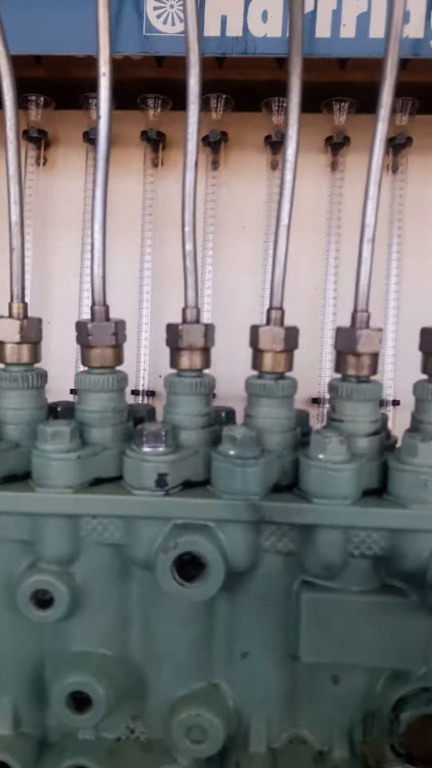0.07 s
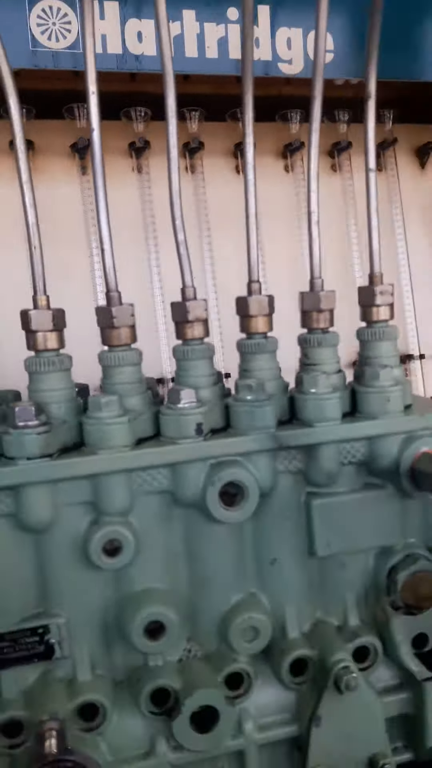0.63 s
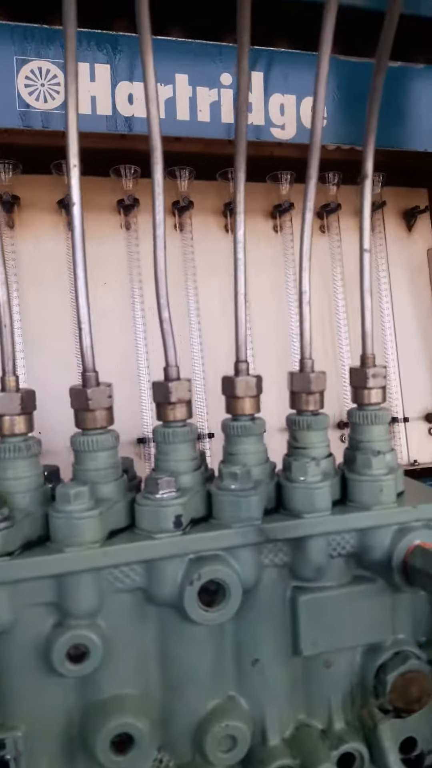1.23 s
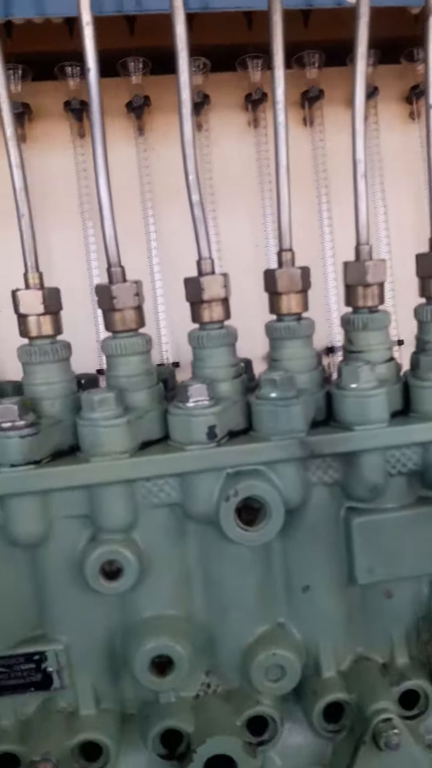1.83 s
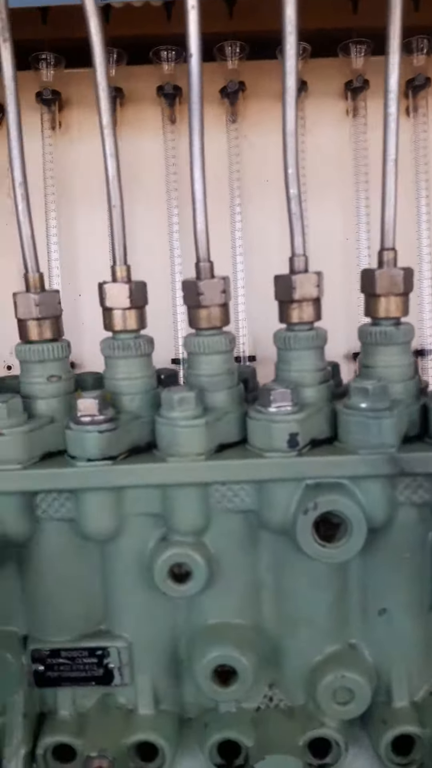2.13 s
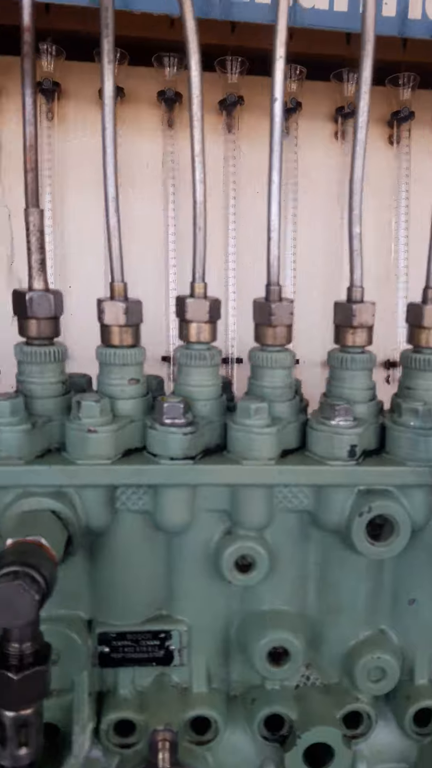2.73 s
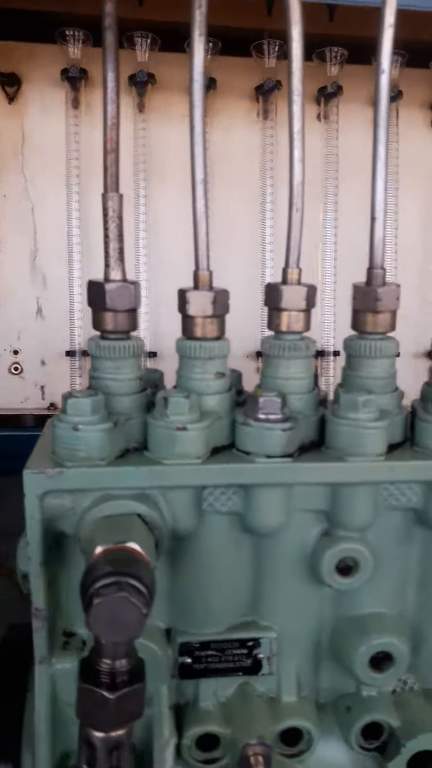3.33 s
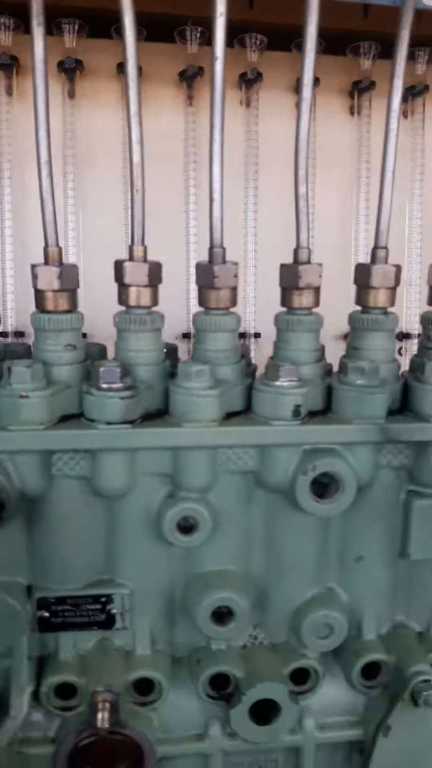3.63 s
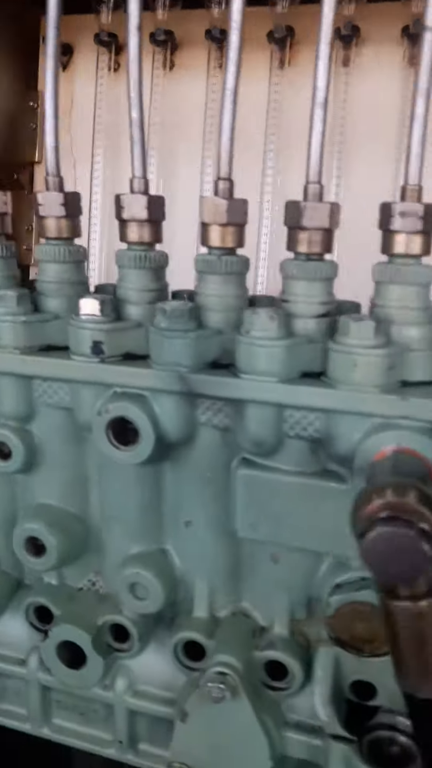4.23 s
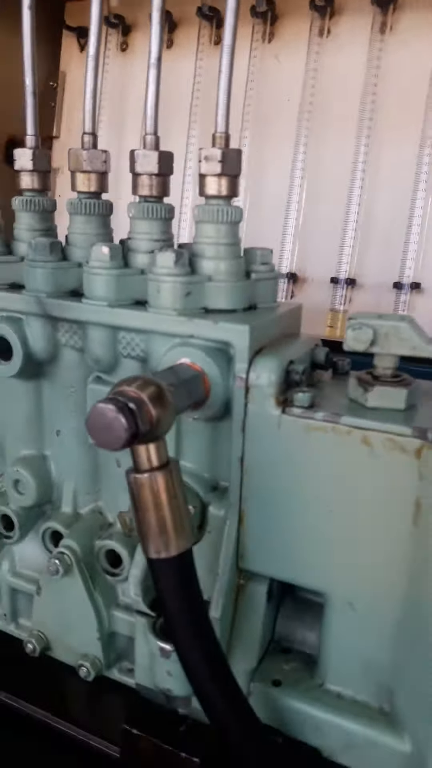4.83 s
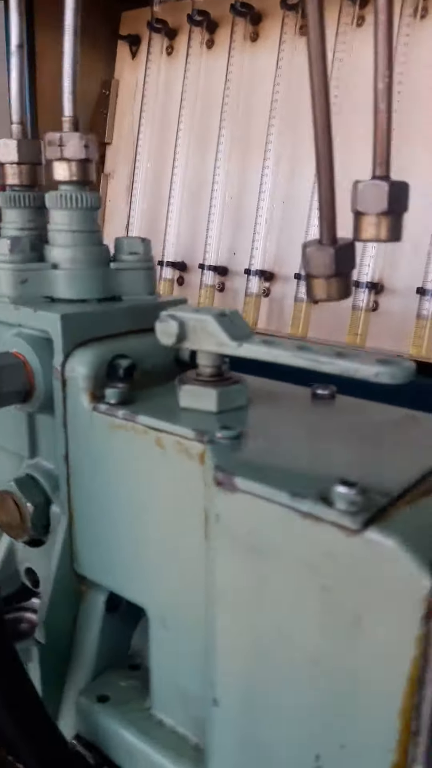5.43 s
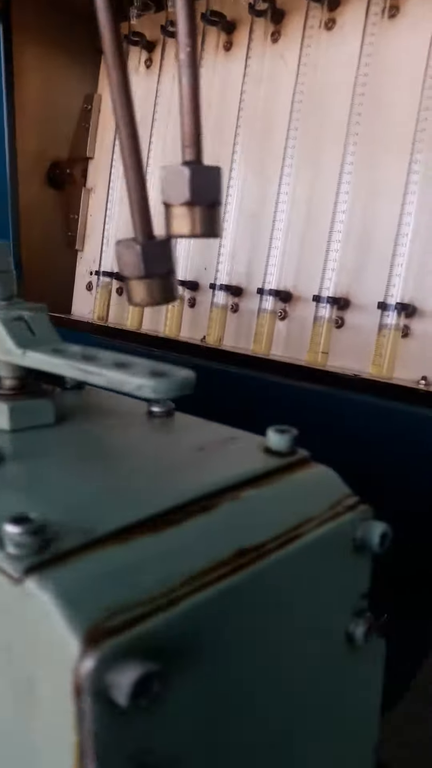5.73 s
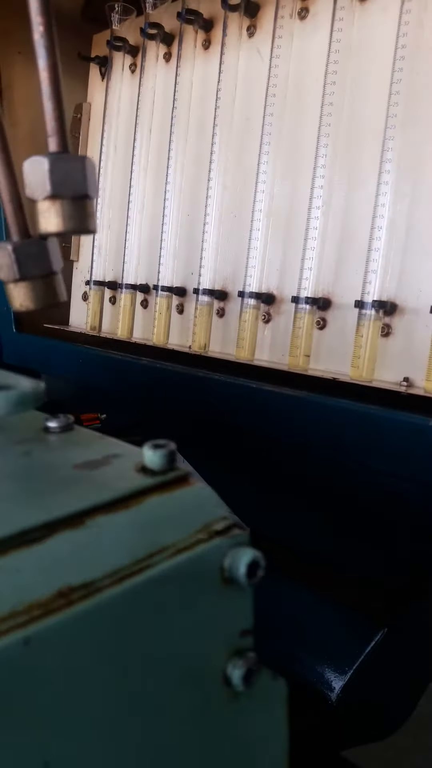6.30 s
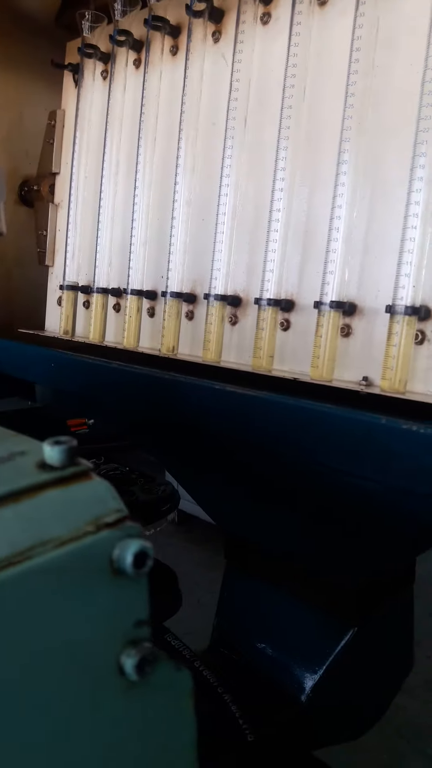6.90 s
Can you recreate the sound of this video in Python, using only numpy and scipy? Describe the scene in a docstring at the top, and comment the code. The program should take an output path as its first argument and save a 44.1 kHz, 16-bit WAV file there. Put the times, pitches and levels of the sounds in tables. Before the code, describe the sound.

Steady mechanical humming and fast, slightly limping clatter from a fuel pump, with ringing steel pipes and bright ticking.

```python
"""A diesel injection pump drones and clatters on a workshop test bench, turning about 590 times a minute.
Eight plungers (small pistons) each push once a turn and make the housing hum. Each stroke knocks, its
valve shuts with a clack, an injector needle ticks and sprays, and spilling fuel hisses. The strokes are
unequal, so the clatter limps once a turn. Steel pipes and the cover of the governor (the speed control)
ring along. We listen through a phone carried from the pump's face, round a corner, to the governor end."""
import sys
import numpy as np
from scipy import signal
from scipy.fft import rfft, irfft
from scipy.io import wavfile
from scipy.ndimage import uniform_filter1d

SR = 44100
rng = np.random.default_rng(int(sys.argv[2]) if len(sys.argv) > 2 else 0)


def unload_audio(sound):
    """Save the sound as a 16-bit wav file, at the path given as the first command line argument."""
    columns = np.transpose(np.atleast_2d(sound))
    # keep every value between -1 and 1, then stretch to whole-number steps
    steps = np.round(np.clip(columns, -1, 1) * 32767)
    wavfile.write(sys.argv[1], SR, steps.astype(np.int16))


N = 311346
T = np.arange(N) / SR
SHAFT_HZ = 9.8627  # turns a second


# The tones in the hum: (multiple of the shaft speed, level at face [dB], level at governor end [dB])
HUM_TONES = [(8, -25, -25), (13, -23, -22), (16, -6, -9), (17, -17, -20), (20, -15, -17), (22, -16, -16),
             (24, -2, -1), (25, -15, -26), (26, -22, -15), (27, -15, -26), (28, -15, -22), (30, -14, -16),
             (31, -25, -20), (32, -19, -23), (33, -17, -11), (34, -10, -9), (35, -14, -16), (36, -19, -13),
             (40, -10, -9), (48, -14, -27), (56, -19, -20), (64, -22, -15), (72, -22, -18), (80, -17, -26),
             (96, -11, -26), (101, -13, -17), (104, -13, -26), (112, -11, -27), (117, -21, -16),
             (119, -16, -23)]
# Overall level of the deep tones: (face [dB], corner [dB], governor end [dB])
DEEP_HUM_DB = (-18.2, -16.5, -16)
# Quiet and loud spots of a standing wave in the room: (place [0-1], half-width [0-1], level [dB])
ROOM_SPOTS = [(.13, .06, -2.5), (.6, 0.22, 2.8)]

def housing_hum(clock, place, near_db):
    """The strokes shake the housing at multiples of the shaft speed, which add up to a drone."""
    # Deep tones fill the room, so distance matters little; the higher ones carry like the knock.
    deep_db = level_at(place, DEEP_HUM_DB) + .35 * near_db
    corner_dip_db = 2.9 * np.sin(np.pi * place)  # sound from two walls partly cancels here
    high_db = level_at(place, KNOCK_LEVEL_DB) + near_db + 1.73 - corner_dip_db
    spots_db = sum(db * np.exp(-((place - centre) / width) ** 2) for centre, width, db in ROOM_SPOTS)
    hum = 0
    for multiple, face_db, end_db in HUM_TONES:
        db = face_db + (end_db - face_db) * place + (deep_db if multiple < 26 else high_db)
        if multiple == 24:  # the strongest tone forms the standing wave
            db = db + spots_db
        # Each tone crosses the bench with its own delay, spreading the hum over the whole turn.
        lag = .096 * multiple ** 2 + .012 * wander(3.97)
        tone = np.sin(2 * np.pi * (multiple * SHAFT_HZ * clock - lag))
        hum = hum + gain(db + .5 * wander(2.98)) * tone
    return np.sqrt(2) * hum


# The eight strokes of a turn: (start [s], knock [dB], reseat knock [dB], clack [dB], tick [dB], spill [dB])
PLUNGER_STROKES = [(.0095, -1, -7, -2, -3, -4), (.0215, 0, -1, -4, -7, -4), (.0348, 1, -4, -4, -3, -2),
                   (.0475, 0, -5, -3, -6, -4), (.0602, -2, -4, 0, 1.4, 0), (.0725, -5, -6, -3, -6, -4),
                   (.0850, -1, -7, -2, -4, -3), (.0972, -2, -4, -4, -7, -4)]
STARTS_S, KNOCKS_DB, RESEATS_DB, CLACKS_DB, TICKS_DB, SPILLS_DB = np.transpose(PLUNGER_STROKES)
# Tone colour of the cast metal body: (frequency [Hz], face [dB], corner [dB], governor end [dB])
BODY_COLOUR = [(49.4, -60, -74, -50), (101, -24.5, -28, -24.5), (209, -17, -20, -24.5),
               (352, -17, -20, -10), (432, -20.5, -28, -22.5), (520, -19.5, -23.5, -27.5),
               (646, -23.5, -26.5, -17.5), (793, -15.5, -17, -21), (885, -19, -24.5, -24.5),
               (982, -12, -28, -12.5), (1036, -16, -21.5, -24), (1140, -18.5, -24.5, -23.5),
               (1646, -22, -25.5, -25), (2610, -48.5, -53, -52)]
# Level of the knock: (face [dB], corner [dB], governor end [dB])
KNOCK_LEVEL_DB = (-20.5, -19, -18.5)

def plunger_knock(clock, place):
    """Each plunger knocks on the pump's body, and its valve reseats with a second knock half a stroke later,
    almost alike on every turn."""
    hits = blows(clock, KNOCKS_DB, late_s=0, rise_s=.001, decay_s=.0035, scatter_db=.5)
    reseats = blows(clock, RESEATS_DB, late_s=.006, rise_s=.001, decay_s=.003, scatter_db=.5)
    force = pulsed(rattle(clock, alike=.95, renew_s=1.7), hits + reseats, echo_db=-4 + 9 * place)
    body = np.array(BODY_COLOUR)
    knock = 0
    for side in range(3):  # face, corner, governor end: the nearest is heard most
        share = np.maximum(1 - np.abs(2 * place - side), 0)
        knock = knock + share * colour(force, body[:, [0, side + 1]])
    return gain(level_at(place, KNOCK_LEVEL_DB)) * knock


# Tone colour of a closing valve: (frequency [Hz], level [dB])
CLACK_COLOUR = [(300, -19.5), (1000, -9), (1600, -6), (2000, -2.5), (2350, -1.5), (2750, 3), (3150, -3),
                (3450, -6.5), (4200, -7), (5000, -14.5), (8000, -48.5)]
# Level of the clack: (face [dB], corner [dB], governor end [dB])
CLACK_LEVEL_DB = (-19.5, -19.5, -19)

def valve_clack(clock, place):
    """The valves that let the fuel out clack shut, one for each stroke."""
    power = blows(clock, CLACKS_DB, late_s=.0004, rise_s=.0018, decay_s=.006, scatter_db=.5)
    clack = pulsed(rattle(clock, alike=.6, renew_s=.903), power, echo_db=.5 + 1.7 * place)
    return gain(level_at(place, CLACK_LEVEL_DB)) * colour(clack, CLACK_COLOUR)


# Ringing notes of the steel pipes: (frequency [Hz], width [Hz], level [dB])
PIPE_NOTES = [(2770, 74, -10.5), (3053, 23, 8.5), (3124, 33, 0)]
# Level of the pipes: (face [dB], corner [dB], governor end [dB])
PIPE_LEVEL_DB = (-26.5, -26.5, -27.5)

def pipe_ping(clock, place):
    """Each shot of fuel jolts the steel pipes, which ping on after it."""
    power = blows(clock, TICKS_DB, late_s=0, rise_s=.001, decay_s=.003, scatter_db=.6)
    jolts = pulsed(rattle(clock, alike=.75, renew_s=.8), power, echo_db=-14)
    return gain(level_at(place, PIPE_LEVEL_DB)) * ring(jolts, PIPE_NOTES)


# Ringing notes of the governor cover: (frequency [Hz], width [Hz], level [dB])
COVER_NOTES = [(1975, 35, -5), (2030, 25, 0), (2100, 50, -7)]
# Level of the cover: (face [dB], corner [dB], governor end [dB])
COVER_LEVEL_DB = (-29.5, -23.9, -22.5)

def cover_ring(clock, place):
    """The cover is shaken hardest once a turn; its main note sings at 205 times the shaft speed."""
    hardest_s, swell_db = .021, 3
    swell = gain(swell_db * np.cos(2 * np.pi * SHAFT_HZ * (clock - hardest_s)))
    tone = normalise(gain(1.5 * wander(30)) * np.sin(2 * np.pi * 205 * SHAFT_HZ * clock))
    shake = ring(rattle(clock, alike=.8, renew_s=.8), COVER_NOTES)
    tone_share = .15 + .35 * place  # the note is clearer close to the cover
    cover = np.sqrt(1 - tone_share) * shake + np.sqrt(tone_share) * tone
    return gain(level_at(place, COVER_LEVEL_DB)) * normalise(swell * cover)


# Tone colours of the needle's tick and the fuel spray: (frequency [Hz], level [dB])
TICK_COLOUR = [(2000, -13), (3800, -8.5), (4400, -4.5), (5200, -3.5), (5900, 4), (6500, 2), (7100, -6.5),
               (7900, -26.5), (10000, -43)]
SPRAY_COLOUR = [(8000, -24), (10500, -7), (12000, -3), (13600, 5), (16000, -3)]
# Their levels: (face [dB], corner [dB], governor end [dB])
TICK_LEVEL_DB = (-25.3, -27, -29)
SPRAY_LEVEL_DB = (-40.4, -42, -46)

def injectors(clock, place):
    """Needles snap with a bright tick and a fine spray, both more blurred from the governor end."""
    power = blows(clock, TICKS_DB, late_s=.0003, rise_s=.0016, decay_s=.0042, scatter_db=.9)
    tick = pulsed(rattle(clock, alike=.31, renew_s=1.26), power, echo_db=-3.5 + 5.9 * place)
    spray = pulsed(rng.standard_normal(N), power, echo_db=-14 + 8 * place)
    return (gain(level_at(place, TICK_LEVEL_DB)) * colour(tick, TICK_COLOUR)
            + gain(level_at(place, SPRAY_LEVEL_DB)) * colour(spray, SPRAY_COLOUR))


# Tone colour of the spilling fuel: (frequency [Hz], level [dB])
SPILL_COLOUR = [(5000, -6), (7300, -2), (8000, -8), (8700, 1), (9250, 2), (9650, 0), (10100, 3),
                (11300, -5), (12500, -16), (16000, -30)]
# Level of its hiss: (face [dB], corner [dB], governor end [dB])
SPILL_LEVEL_DB = (-41, -39.5, -39.5)

def fuel_spill(clock, place):
    """Spare fuel hisses out with each stroke, swelling a little more slowly than the knock."""
    power = blows(clock, SPILLS_DB, late_s=-.00072, rise_s=.0048, decay_s=.0044, scatter_db=2.5)
    hiss = pulsed(rng.standard_normal(N), power, echo_db=-9 + 2 * place)
    return gain(level_at(place, SPILL_LEVEL_DB)) * colour(hiss, SPILL_COLOUR)


def blows(clock, levels_db, late_s, rise_s, decay_s, scatter_db):
    """Power of one blow per plunger: it rises fast, dies away and differs a little every turn."""
    step = 4  # samples
    power = 0
    for start_s, db in zip(STARTS_S, levels_db):
        turn, fraction = np.divmod((clock[::step] - start_s - late_s) * SHAFT_HZ + 2, 1)
        age_s = fraction / SHAFT_HZ
        force_per_turn = gain(db + scatter_db * rng.standard_normal(80))
        shape = np.minimum(age_s / rise_s, 1) * np.exp(-np.maximum(age_s - rise_s, 0) / decay_s)
        power = power + (force_per_turn[turn.astype(int)] * shape) ** 2
    return np.repeat(power, step)[:N]


def rattle(clock, alike, renew_s):
    """Noise of parts touching. The share `alike` repeats each turn, slowly changing; the rest is new."""
    turn_samples = round(SR / SHAFT_HZ)
    spot = (clock * SHAFT_HZ % 1 * turn_samples).astype(int) % turn_samples
    phases = 2 * np.pi * rng.random((40, turn_samples // 2 + 1))
    patterns = normalise(irfft(np.exp(1j * phases), turn_samples))
    stage = T / renew_s
    current, blend = stage.astype(int), stage % 1 * np.pi / 2
    repeated = np.cos(blend) * patterns[current, spot] + np.sin(blend) * patterns[current + 1, spot]
    return np.sqrt(alike) * repeated + np.sqrt(1 - alike) * rng.standard_normal(N)


def pulsed(noise, power, echo_db):
    """Noise that pulses with the blows, over an even wash of echo from the workshop walls."""
    echo = gain(echo_db) ** 2
    return noise * np.sqrt((power / np.mean(power) + echo) / (1 + echo))


def ring(force, notes):
    """Metal rings at its own notes when shaken; the result has strength 1."""
    return normalise(sum(gain(db) * signal.lfilter(*signal.iirpeak(hz, hz / width, SR), force)
                         for hz, width, db in notes))


def colour(sound, points):
    """Filter a sound along (frequency [Hz], level [dB]) points; the result has strength 1."""
    hz, db = np.transpose(points)
    grid_hz = np.maximum(np.fft.rfftfreq(4096, 1 / SR), 1)
    curve_db = np.interp(np.log(grid_hz), np.log(hz), db)
    # Fold the filter forward in time, so that nothing rings before its blow.
    folded = irfft(np.log(gain(curve_db)))
    half = len(folded) // 2
    folded[1:half] *= 2
    folded[half + 1:] = 0
    tap_response = irfft(np.exp(rfft(folded)))
    return normalise(signal.fftconvolve(sound, tap_response)[:N])


def wander(rate_hz):
    """A smooth random drift, roughly 1 either side of zero."""
    step = 16  # samples
    hold = int(SR / step / rate_hz)
    stairs = np.repeat(rng.standard_normal(N // (step * hold) + 2), hold)
    smooth = uniform_filter1d(uniform_filter1d(stairs, hold), hold)
    return np.repeat(1.3 * smooth, step)[:N]


def level_at(place, levels_db):
    """Blend the levels at the face, the corner and the governor end."""
    return np.interp(place, [0, .5, 1], levels_db)


def gain(db):
    """Turn decibels into a number to multiply by."""
    return 10 ** (np.asarray(db) / 20)


def normalise(sound):
    """Scale to an average strength (rms) of 1."""
    return sound / np.sqrt(np.mean(sound ** 2))


# Where the phone is: (time [s], place [0 = face, 0.5 = corner, 1 = governor end])
PHONE_PLACE = [(0, 0.0041), (2.9, 0), (3.9, 0.19), (4.4, 0.46), (5.2, 0.63), (5.7, 0.91), (7.06, 1)]
# How far it is from the pump: (time [s], distance [times the usual one])
PHONE_DISTANCE = [(0, 1.14), (.8, 1.13), (1.15, .99), (2.1, .97), (2.8, .86), (3.6, 1.07), (4.1, 1.13),
                  (4.55, .94), (5.45, 1.04), (5.8, .96), (7.06, 1.03)]

def scene():
    """One shaft times everything; the phone's place and distance set the balance."""
    place = np.interp(T, *np.transpose(PHONE_PLACE))
    distance = np.interp(T, *np.transpose(PHONE_DISTANCE))
    clock = T + .00002 * wander(5) + .00006 * wander(.8)  # seconds; the shaft's speed wavers slightly
    hum = housing_hum(clock, place, near_db=-20 * np.log10(distance))
    clatter = plunger_knock(clock, place) + valve_clack(clock, place)
    ringing = pipe_ping(clock, place) + cover_ring(clock, place)
    fuel = injectors(clock, place) + fuel_spill(clock, place)
    mix = hum + (clatter + ringing + fuel) / distance
    return mix[None]


def record(dry):
    """The phone thins the deep bass, rounds the tallest peaks and cuts the highest treble."""
    bass_hz, top_hz = 62, 15800
    thin = signal.sosfilt(signal.butter(4, bass_hz, "high", fs=SR, output="sos"), dry)
    rounded = thin / (1 + np.abs(thin) ** 12) ** (1 / 12)
    return signal.sosfilt(signal.ellip(10, .1, 80, top_hz, fs=SR, output="sos"), rounded)


dry = scene()
out = record(dry)
unload_audio(out)
```